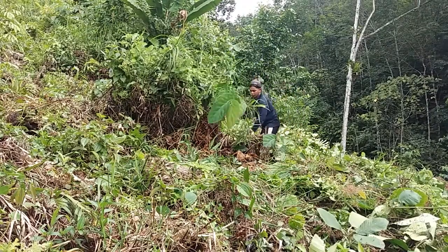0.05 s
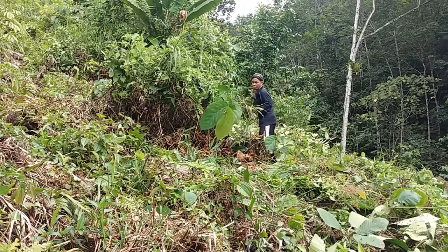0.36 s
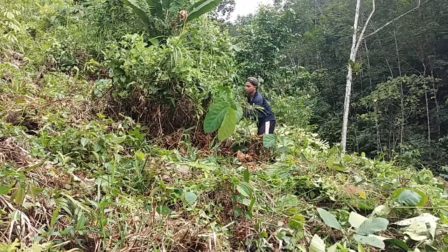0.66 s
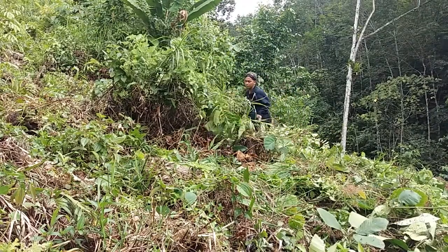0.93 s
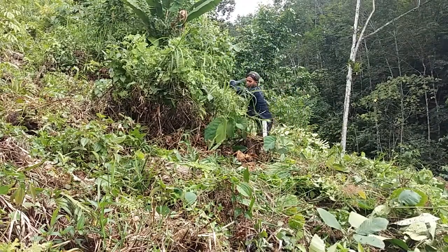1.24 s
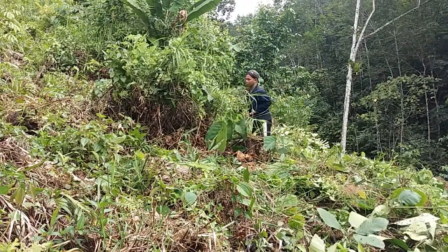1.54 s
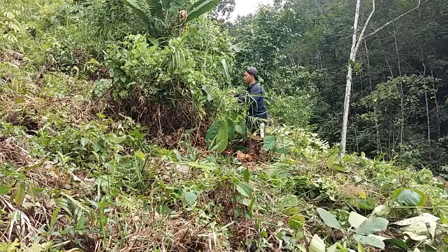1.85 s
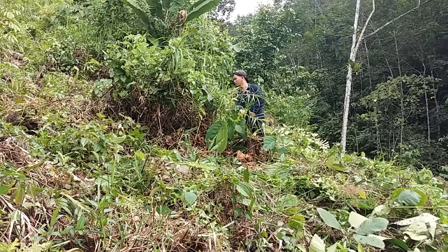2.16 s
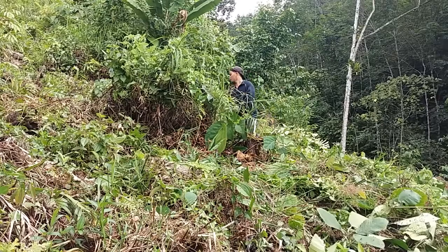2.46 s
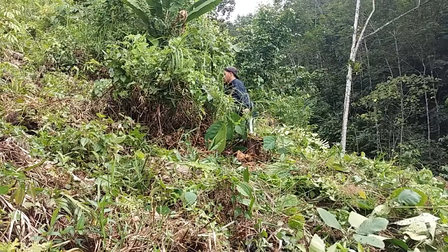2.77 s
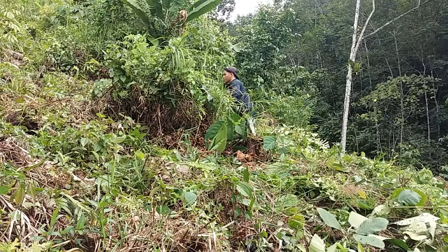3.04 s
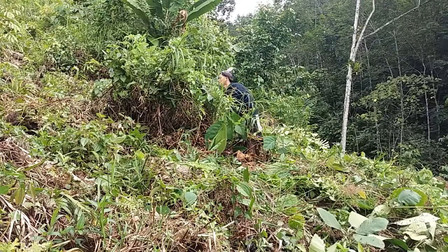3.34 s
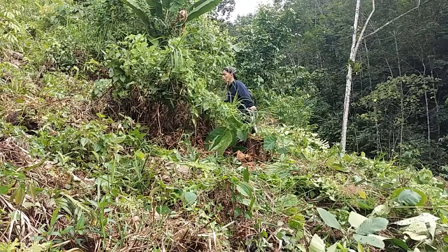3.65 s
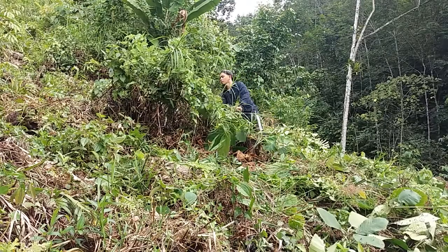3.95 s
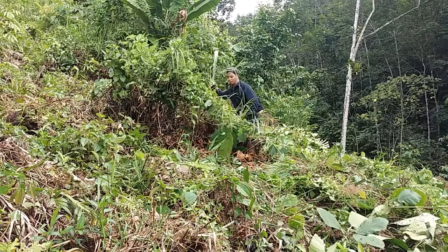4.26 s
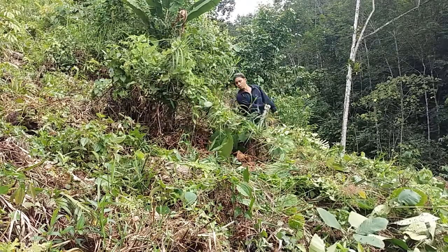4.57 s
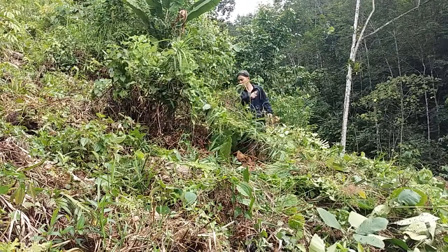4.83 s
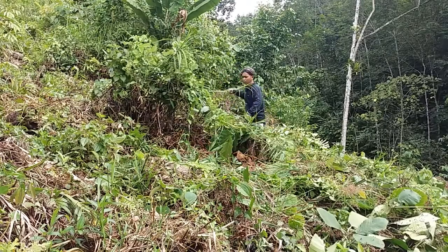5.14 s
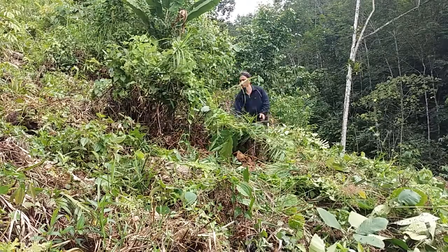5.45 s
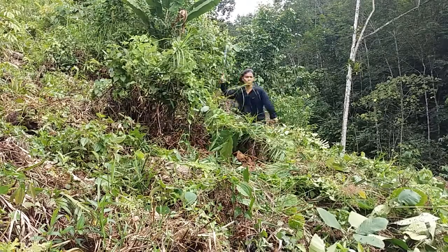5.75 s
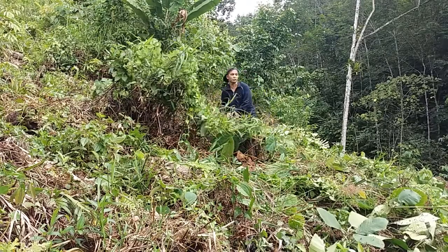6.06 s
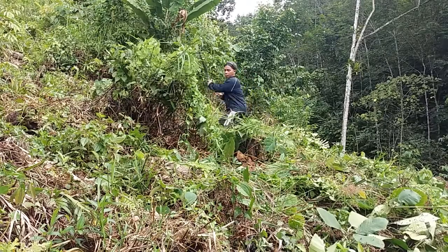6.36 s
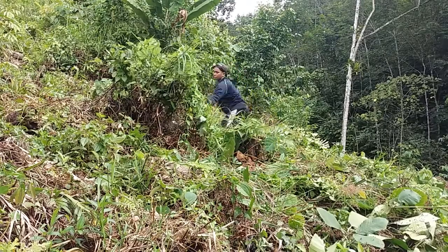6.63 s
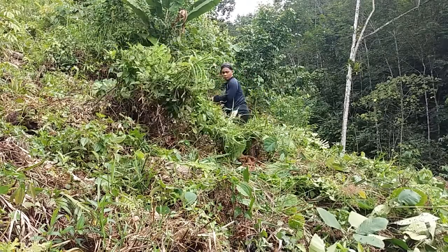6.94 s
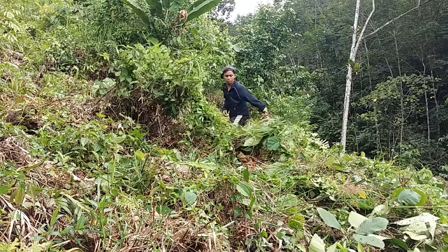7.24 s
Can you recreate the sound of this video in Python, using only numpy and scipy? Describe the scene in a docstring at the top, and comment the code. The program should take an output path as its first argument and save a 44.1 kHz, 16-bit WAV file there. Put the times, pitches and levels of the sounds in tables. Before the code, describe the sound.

Cicadas drone steadily on a forested hillside, a high, finely pulsing buzz over a soft wash of air. Some metres away, a long blade chops through brush, clearly louder than the background. Each stroke brushes leaves, snaps and tears a stalk, thuds dully and leaves a short rustle, with a light outdoor echo. Chops land at about 0.2, 0.8, 1.5, 2.2 and 3 seconds, then every half second from 3.5 to 6, and again at 6.7 and 7.3. The steel rings briefly once near 1.2 seconds. Small twig snaps fall between strokes, with a sharp, bright crack at 3.5 and a pair near 7 seconds. Small birds give faint rising whistles, falling chirps and short buzzes throughout. From about 1.4 to 4.8 seconds, a far animal quietly repeats a short, low falling note among the trees.

```python
"""Over a steady drone of cicadas, a long blade chops through brush some metres away on a forested hillside.
Each stroke brushes leaves, snaps a stalk, tears its fibres, thuds against the stems and leaves the bush
rustling: fracture and friction release impulses, which the plants colour. Once the steel rings in its modes.
The cicadas pulse through their resonant bodies, small birds chirp and a far animal repeats a low falling
note. Trunks and slope scatter echoes, and a soft wash of air lies under it all."""
import sys
import numpy as np
from scipy import signal
from scipy.fft import rfft, irfft
from scipy.io import wavfile
from scipy.ndimage import uniform_filter1d

SR = 44100
rng = np.random.default_rng(int(sys.argv[2]) if len(sys.argv) > 2 else 0)


def unload_audio(sound):
    """Save the sound as a 16-bit wav file, at the path given as the first command line argument."""
    columns = np.transpose(np.atleast_2d(sound))
    # keep every value between -1 and 1, then stretch to whole-number steps
    steps = np.round(np.clip(columns, -1, 1) * 32767)
    wavfile.write(sys.argv[1], SR, steps.astype(np.int16))


N = 326382

# Spectrum of rustling leaves. Each row: frequency in Hz, relative level in dB.
LEAF_SPECTRUM = [(60, -6.5), (250, -3), (520, -7), (950, -0.5), (2200, -4.5), (4500, -3.5), (8000, -9),
                 (11000, -15.5), (15500, -21.5)]


def amp(db):
    """Amplitude grows tenfold for every 20 dB."""
    return 10 ** (np.asarray(db) / 20)


def unit_rms(x):
    """Normalisation to a mean power of one."""
    return x / np.sqrt(np.mean(x ** 2) + 1e-20)


def curve_at(points, hz):
    """Interpolation on a logarithmic frequency axis."""
    f, value = np.transpose(points)
    return np.interp(np.log(hz + 1), np.log(f + 1), value)


def add(mix, s, sound):
    """Superposition: a sound joins the mix at s seconds."""
    part = mix[max(round(s * SR), 0):][:len(sound)]
    part += sound[:len(part)]


def wander(cutoff_hz, size=2048):
    """Low-passed noise gives a slow random drift of unit size."""
    hz = np.fft.rfftfreq(size, N / SR / size)
    slow = unit_rms(irfft(rfft(rng.standard_normal(size)) / (1 + (hz / cutoff_hz) ** 4)))
    return np.interp(np.linspace(0, size - 1, N), np.arange(size), slow)


def swell(t, peak_s):
    """A critically damped envelope rises to one at peak_s and dies away."""
    return t / peak_s * np.exp(1 - t / peak_s)


def click(spectrum, tilt_db=0, ring_hz=1000, ring_db=0, size=2048):
    """A minimum-phase impulse response of unit energy, with a tilt per octave and one resonance."""
    hz = abs(np.fft.fftfreq(size, 1 / SR))
    db = curve_at(spectrum, hz) + tilt_db * np.log2(np.maximum(hz, 700) / 1000)
    db += ring_db / (1 + ((hz / ring_hz - 1) / 0.072) ** 2)
    log_response = np.conj(signal.hilbert(np.log(amp(db))))
    shape = np.fft.ifft(np.exp(log_response)).real
    return shape / np.linalg.norm(shape)


def air(db=-57, patchy_db=1.5, swell_db=0.6):
    """The valley's wash is spectrally shaped noise, drifting in patches below and smooth in the treble."""
    # Each row: frequency in Hz, relative level in dB.
    air_spectrum = [(20, -55), (50, -3), (85, 4.5), (160, 0.5), (300, -3.5), (600, 1.5), (900, 1.5),
                    (2100, -6.5), (3300, -9), (5300, -14.5), (9500, -14.5), (12500, -21), (16000, -4)]
    hz = np.fft.rfftfreq(1024, 1 / SR)
    real, imag, patches = rng.standard_normal((3, N // 256 + 5, len(hz)))
    patches = uniform_filter1d(patches, size=14, axis=0)  # smooth in time
    patches = unit_rms(uniform_filter1d(patches, size=8, axis=1))  # and in frequency
    gain = amp(curve_at(air_spectrum, hz) + patchy_db * patches / (1 + (hz / 7000) ** 4))
    wash = signal.istft(((real + 1j * imag) * gain).T, nperseg=1024, noverlap=768)[1][:N]
    return amp(db + swell_db * wander(0.75)) * unit_rms(wash)


def forest(x, echoes_per_s=3000):
    """Reverberation by scattering from trunks and slope, each band decaying at its own rate."""
    # Each row: frequency in Hz, time to fall 60 dB in seconds.
    decay_times = [(150, 0.92), (1000, 0.52), (5000, 0.7), (14000, 1)]
    taps = rng.standard_normal(SR) * (rng.random(SR) < echoes_per_s / SR)
    hz, t, bands = signal.stft(taps, SR, nperseg=256)
    decay = amp(-60 * t / curve_at(decay_times, hz)[:, None])
    tail = signal.istft(bands * decay * np.minimum(t / 0.0081, 1), SR)[1]
    return signal.fftconvolve(x, tail / np.linalg.norm(tail))[:N]


def cicadas():
    """Resonances of hollow bodies shape a buzz that is amplitude-modulated in a few shared rhythms."""
    # Each row: centre frequency in Hz, width in Hz, level in dB.
    resonances = [(3176, 170, -75.5), (6190, 760, -70), (7115, 320, -65), (7402, 135, -56),
                  (7616, 123, -61.5), (7600, 650, -58), (7897, 133, -58.5), (8175, 180, -66),
                  (8120, 660, -68.5), (15400, 1000, -81)]
    # Each row: pulses per second, modulation depth from 0 to 1, drift as a fraction of the rate.
    throbs = [(33.94, 0.27, 0.0093), (48.2, 0.27, 0.019), (83.2, 0.28, 0.059)]
    out, f = np.zeros(N), np.fft.rfftfreq(N, 1 / SR)
    rhythms = [(depth, np.cumsum(per_s * (1 + drift * wander(8.15))) / SR)
               for per_s, depth, drift in throbs]
    for hz, width, db in resonances:
        body = 1 / (1 + 1j * (f - hz) / width * 1.73) ** 2 / (1 + ((f - hz) / width / 1.1) ** 4)
        buzz = irfft(rfft(rng.standard_normal(N)) * body, N)
        pulses = 1 + sum(depth * np.cos(2 * np.pi * (turns + rng.random())) for depth, turns in rhythms)
        out += amp(db) * unit_rms(buzz * pulses)
    return out


def note(db, length_s, start_hz, end_hz, waver=0.017, flutter_db=4.0, easing=1.7):
    """A frequency-modulated tone glides and levels off, wavering and fluttering through the leaves."""
    progress = np.linspace(0, 1, round(length_s * SR))
    drifts = unit_rms(uniform_filter1d(rng.standard_normal((2, SR // 4)), size=160))
    pitch, level = drifts[:, :len(progress)]
    hz = (end_hz + (start_hz - end_hz) * (1 - progress) ** easing) * (1 + waver * pitch)
    envelope = amp(db + flutter_db * level) * signal.windows.tukey(len(progress), .4)
    return envelope * np.sin(2 * np.pi * np.cumsum(hz) / SR)


def birds(far_count=12, far_db=-77.5, far_hz=4880):
    """Frequency modulation makes rising whistles, falling chirps and buzzes; far birds answer at random."""
    # Rising whistles and falling chirps. Each row: start in seconds, level in dB.
    whistles = [(1.583, -64), (2.397, -62.5), (3.339, -61.5), (4.378, -65.5), (5.132, -58), (6.136, -63)]
    chirps = [(1.515, -63), (3.975, -62), (4.285, -71), (6.322, -68)]
    # Each row: start in seconds, level in dB, pitch in Hz.
    near_buzzes = [(0.49, -69, 5200), (1.93, -69, 5270), (2.49, -71, 5320), (2.71, -75, 4980),
                   (4.47, -72, 4930), (5.89, -68, 5100), (6.84, -59, 4940)]
    out = np.zeros(N)
    for s, db in whistles:
        add(out, s, note(db, length_s=.048, start_hz=2600, end_hz=4180, flutter_db=5.5, easing=1.3))
    for s, db in chirps:
        add(out, s, note(db, length_s=.075, start_hz=3800, end_hz=3180))
    far_starts = (np.arange(far_count) + rng.random(far_count)) * N / SR / far_count
    for s, db, hz in list(near_buzzes) + [(s, far_db, far_hz) for s in far_starts]:
        add(out, s, note(db, length_s=0.074, start_hz=hz, end_hz=hz, waver=0.021))
    return out


def far_animal():
    """A low tone repeats, each time with the same downward frequency glide."""
    # Each row: start in seconds, level in dB.
    yelps = [(1.383, -56.5), (1.680, -61), (2.565, -58.5), (2.824, -59), (3.130, -54), (3.423, -53),
             (3.683, -55), (3.830, -57), (4.090, -52.5), (4.369, -59), (4.503, -56), (4.754, -57.5)]
    out = np.zeros(N)
    for s, db in yelps:
        add(out, s, note(db, length_s=.042, start_hz=880, end_hz=610, waver=.02))
    return out


def snaps(per_s, spread_db, size=32768):
    """A Poisson train of tiny breaks, a few much larger than the rest."""
    strength = amp(spread_db * np.minimum(rng.exponential(1, size), 3))
    return unit_rms(strength * rng.choice([-1, 1], size) * (rng.random(size) < per_s / SR))


def scatter(spread_s=0.0014, size=512):
    """All-pass scattering: nearby leaves smear a snap over milliseconds and keep its colour."""
    burst = rfft(rng.standard_normal(size) * np.exp(-np.arange(size) / SR / spread_s), size * 4)
    return np.roll(irfft(burst / abs(burst)), size // 4)[:size]


def bundles(length, spread_db=2.5):
    """Random amplitude modulation: fibres give way in bundles a few milliseconds long."""
    return amp(spread_db * unit_rms(uniform_filter1d(rng.standard_normal(length), size=150)))


def sinking_growth(db, rise_s=0.08):
    """Many small impacts of twigs and leaves merge into a swish as the cut growth sinks."""
    crackle = snaps(6000, 4.1)
    sinking = amp(db) * crackle * swell(np.arange(len(crackle)) / SR, rise_s)
    return signal.fftconvolve(sinking, np.convolve(click(LEAF_SPECTRUM), scatter()))


def thud(db, rise_s, stem_size, ring_hz=240, ring_db=3):
    """Stems push dully against the soil; their frequencies scale inversely with their size."""
    # A stem of size 1. Each row: frequency in Hz, relative level in dB.
    thud_spectrum = [(25, -75), (70, -6), (140, -1.5), (400, -3.5), (620, -22), (1500, -33), (5000, -79)]
    push = swell(np.arange(SR // 5) / SR, rise_s)
    colour = [(hz / stem_size, level) for hz, level in thud_spectrum]
    response = click(colour, 0, ring_hz / stem_size, ring_db)
    sound = signal.fftconvolve(push * rng.standard_normal(len(push)), response)
    return amp(db) * sound * np.linalg.norm(push) / np.linalg.norm(sound)


def blade_ring(rise_s=0.0046):
    """Free vibration: the steel rings in damped modes where it glances off something hard."""
    # Each row: frequency in Hz, relative level in dB, time to fall 60 dB in seconds.
    steel_modes = [(2110, -6.5, 0.092), (3860, -15, 0.14), (5160, -1.5, 0.13), (5360, -17, .15)]
    # Each row: start in seconds, level in dB, attenuation of the low modes in dB.
    glances = [(1.164, -42, -6), (1.186, -36.5, 12)]
    out, t = np.zeros(N), np.arange(SR // 2) / SR
    for s, db, low_loss_db in glances:
        ring = sum(amp(mode_db - low_loss_db * (hz < 4500) - 60 * t / t60) * np.sin(2 * np.pi * hz * t)
                   for hz, mode_db, t60 in steel_modes)
        add(out, s, amp(db) * ring * (1 - np.exp(-t / rise_s)))
    return out


def stroke(tear_db, crack_db, brush_s, cut_s, tilt_db, stalk_hz, rustle_db, release_s=0.011, knock_db=12):
    """Fracture excites the stalk's resonance and shakes the bush; returns seconds to contact and sound."""
    # Breaking fibres. Each row: frequency in Hz, relative level in dB.
    fibre_spectrum = [(40, -13), (130, -2.5), (350, -4), (560, -4.5), (950, 4.5), (1800, 3), (2800, 3),
                      (5000, 1.5), (7800, 0.5), (10000, -9.5), (15500, -19)]
    brush_db, settle_s = -8, 0.057
    fibres, leaves = snaps(7000, 4.8), snaps(6000, 3.9)
    contact = len(fibres) // 8
    t = (np.arange(len(fibres)) - contact) / SR
    approach = amp(brush_db) * np.exp(np.minimum(t, 0) / brush_s) * np.clip(3 * (t / brush_s + 0.94), 0, 1)
    cutting = np.exp(-np.maximum(t - cut_s, 0) / release_s)
    force = np.where(t < 0, approach, cutting)  # light through the leaves, full once the edge bites
    tearing = fibres * force * bundles(len(t))
    tearing *= amp(tear_db) * np.linalg.norm(force) / np.linalg.norm(tearing)
    cut = signal.fftconvolve(tearing, click(fibre_spectrum, tilt_db, stalk_hz, ring_db=5))
    crack = scatter() * amp(crack_db) * np.sqrt(SR * .004)  # the energy of 4 ms at crack_db
    # A stalk rings most while still whole, so the crack has its own resonance strength.
    knock = np.convolve(crack, click(fibre_spectrum, tilt_db, stalk_hz, ring_db=knock_db))
    add(cut, (contact - len(crack) // 4) / SR, knock)
    shaking = np.clip(t / 0.0079, 0, 1) * np.exp(-abs(t) / settle_s)
    rustle = signal.fftconvolve(leaves * shaking, click(LEAF_SPECTRUM))
    return contact / SR, cut + amp(rustle_db) * rustle


def chopping(sink_delay_s=.06, sink_db=-18.5):
    """Transients superpose: each stroke cuts, thuds and lets growth sink, among light snaps and scrapes."""
    # Each row: contact in seconds, tearing in dB, crack in dB, brushing rise in seconds, cut length in
    # seconds, tilt in dB per octave, stalk resonance in Hz, thud in dB, relative stem size, rustle in dB.
    strokes = [(0.197, -40, -33, 0.0093, 0.016, -3, 1330, -43.5, 1.17, -42),
               (0.803, -40.5, -31.5, 0.0022, 0.02, -4.5, 945, -43, 1.1, -36.5),
               (1.473, -33.5, -60, 0.0015, 0.016, -1, 1860, -42.5, 0.9, -52),
               (2.198, -33.5, -29.5, 0.0018, 0.0058, -0.6, 915, -50, .95, -43),
               (3.026, -40.5, -34.5, 0.0081, 0.0071, -3, 1700, -52, 1.24, -55.5),
               (3.535, -35.5, -44, 0.0074, 0.0038, -2, 2460, -36, 1.06, -48),
               (4.029, -29.5, -32, 0.0061, 0.0052, -3, 800, -46, 0.83, -41.5),
               (4.567, -33, -35, 0.013, 0.0029, -1.5, 2610, -43.5, 0.77, -42),
               (5.056, -34, -31, 0.018, 0.0067, -.4, 1970, -40, 0.6, -56),
               (5.076, -49, -57, .003, 0.0016, -2, 695, -38.5, 1, -65),
               (5.518, -38.5, -44, 0.0066, 0.012, -1, 940, -44, 0.92, -54),
               (6.014, -34.5, -35.5, 0.013, 0.02, 0.5, 780, -46.5, 0.87, -43.5),
               (6.733, -32, -56, .02, 0.0072, -1.1, 1800, -42.5, 1.3, -38),
               (7.294, -35.5, -46, 0.0085, 0.046, -1, 1210, -43, 1.2, -36.5)]
    # Twigs snap, and the blade scrapes as it rings. Each row: contact in seconds, tearing or scraping
    # in dB, crack in dB, length in seconds, tilt in dB per octave, rustle in dB.
    snaps_and_scrapes = [(0.176, -47.5, -41.5, 0.0058, -4.5, -48.5), (0.487, -51, -49.5, 0.0064, -4.5, -56),
                         (1.078, -49, -43, 0.016, -4, -45), (1.165, -56, -58, .015, -2.5, -57),
                         (3.543, -29.5, -29, 0.00076, 6.5, -50.5), (6.988, -40, -44, 0.0071, 2.5, -48.5),
                         (7.028, -40.5, -38, 0.0023, -2.5, -60)]
    out = np.zeros(N)
    for s, tear_db, crack_db, brush_s, cut_s, tilt_db, stalk_hz, thud_db, stem_size, rustle_db in strokes:
        lead_s, sound = stroke(tear_db, crack_db, brush_s, cut_s, tilt_db, stalk_hz, rustle_db)
        add(out, s - lead_s, sound)
        # The stems give way as the cut goes on: a longer cut makes a later, slower thud.
        add(out, s + 0.362 * cut_s, thud(thud_db, 0.0031 + .2 * cut_s, stem_size))
        add(out, s + sink_delay_s, sinking_growth(rustle_db + sink_db))
    for s, tear_db, crack_db, cut_s, tilt_db, rustle_db in snaps_and_scrapes:
        lead_s, sound = stroke(tear_db, crack_db, brush_s=0.0061, cut_s=cut_s, tilt_db=tilt_db,
                               stalk_hz=5760, rustle_db=rustle_db, release_s=0.0042, knock_db=0)
        add(out, s - lead_s, sound)
    return out


def scene(work_echo_db=-17, call_echo_db=-6):
    """The direct-to-reverberant ratio sets the worker in the open and the animals deep among the trees."""
    work, animals = chopping(), birds() + far_animal()
    echoes = forest(amp(work_echo_db) * work + amp(call_echo_db) * animals)
    return (work + blade_ring() + animals + echoes + cicadas() + air())[None]


def record(dry, low_cut_hz=42, high_cut_hz=15750):
    """Band limiting: the microphone rolls off the bass and the recorder cuts the highest treble."""
    thinned = signal.sosfilt(signal.butter(2, low_cut_hz, "high", fs=SR, output="sos"), dry)
    low_pass = signal.firwin(511, high_cut_hz, window=("kaiser", 9), fs=SR)
    return signal.oaconvolve(thinned, low_pass[None], "same")


dry = scene()
out = record(dry)
unload_audio(out)
```